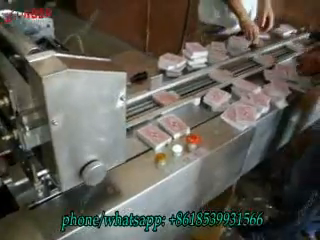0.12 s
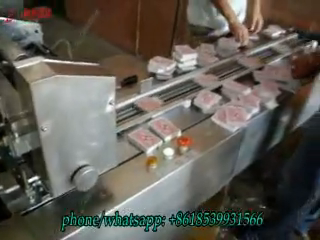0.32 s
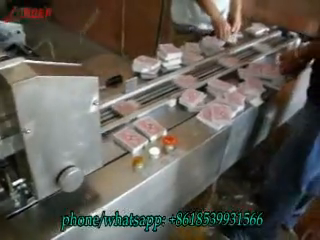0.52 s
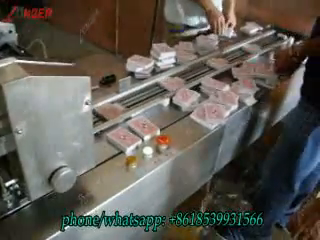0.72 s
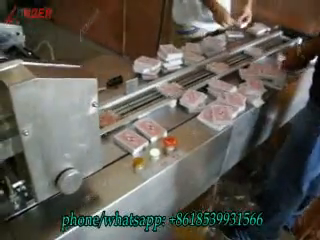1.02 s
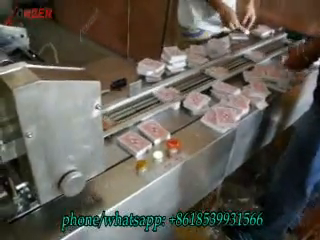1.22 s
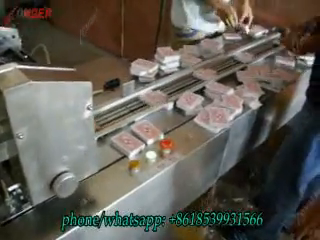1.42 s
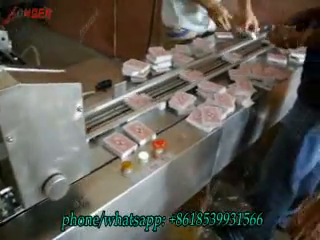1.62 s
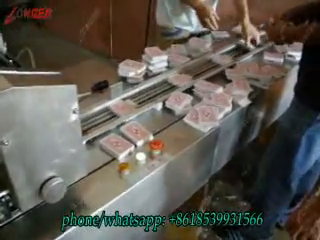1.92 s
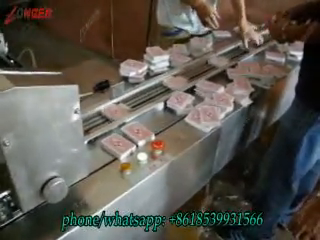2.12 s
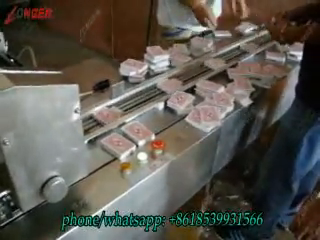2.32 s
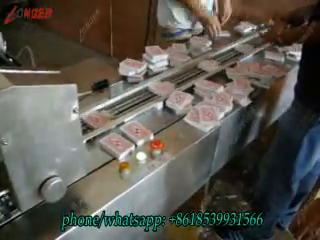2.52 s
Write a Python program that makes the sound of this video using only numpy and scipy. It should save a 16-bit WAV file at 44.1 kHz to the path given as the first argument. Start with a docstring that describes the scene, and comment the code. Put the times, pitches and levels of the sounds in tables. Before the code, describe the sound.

A wrapping machine runs in an echoing workshop: a heavy hollow steel knock, a ringing clack, scattered ticks, then another knock and clack over a quiet motor drone, through a dull, overloading microphone.

```python
"""An echoing workshop, with a cheap, dull microphone whose input overloads on the loudest blows.
A wrapping machine runs: motors and chains drone as bands of noise, with a crackling rattle in the treble.
Once a cycle the linkage ticks and rattles in short noise bursts and clacks on a ringing bar.
Heavy knocks on a hollow steel cabinet stand in front: beating modes, a low thump and a crack."""
import sys
import numpy as np
from scipy import signal
from scipy.fft import rfft, irfft
from scipy.io import wavfile
from scipy.ndimage import uniform_filter1d

SR = 44100
rng = np.random.default_rng(int(sys.argv[2]) if len(sys.argv) > 2 else 0)


def volts_from_db(level):
    """Convert decibel levels to linear amplitude ratios."""
    exponent = np.asarray(level, float) / 20
    return 10 ** exponent


def generate_wav(sig):
    """Save sig (samples, or channels by samples) to the path in sys.argv[1] as 16-bit PCM at SR."""
    pcm = np.round(np.clip(np.atleast_2d(sig).T, -1, 1) * 32767).astype(np.int16)
    wavfile.write(sys.argv[1], SR, pcm)


N = 119070  # 2.7 s
BANDS_HZ = 25 * 2 ** np.arange(0, 7.7, 1 / 3)  # third-octave centres


def unit(x):
    """Scale to rms 1."""
    return x / np.sqrt(np.mean(x ** 2))


def shape_db(table, hz):
    """Read a (frequency [Hz], value) table on a log-frequency axis."""
    table = np.array(table, float)
    return np.interp(np.log(hz), np.log(table[:, 0]), table[:, 1])


def band(hz, width_hz, size):
    """Noise in one bell-shaped band, rms 1."""
    f = np.arange(size // 2 + 1) * SR / size
    bell = np.exp(-0.5 * ((f - hz) / width_hz) ** 2)
    return unit(irfft(rfft(rng.standard_normal(size)) * bell, size))


def fade(t, t60):
    """Exponential decay by 60 dB in t60 seconds, held within 0.01 to 3 s."""
    return np.exp(-np.log(1000) * t / np.clip(t60, 0.01, 3))


def add(out, s, x):
    """Mix x in at s seconds."""
    i = int(s * SR)
    out[i:i + len(x)] += x[:N - i]


def walk(rate):
    """Random levels held 1 / rate s and slewed twice."""
    k = int(SR / rate)
    held = np.repeat(rng.standard_normal(N // k + 1), k)
    return 1.3 * uniform_filter1d(uniform_filter1d(held, k), k)[:N]


def chain_rattle():
    """Chain links strike at random moments and strengths; each strike leaves a very short decay, rms 1."""
    strikes_per_s, spread_db = 140, 3.5
    strikes = rng.random(N) < strikes_per_s / SR
    links = strikes * volts_from_db(spread_db * rng.exponential(size=N))
    return unit(signal.lfilter([1], [1, -0.99], links))


# colour of the motors and gears: (frequency [Hz], relative level [dB per Hz])
DRONE_COLOUR = [(12, -30), (22, 9), (54, -1), (80, -2.5), (156, 0), (290, -1.5), (450, -2), (600, -7.5),
                (800, -4), (1100, -5), (1500, -21.5), (2000, -18.5), (2700, -16.5), (3500, -24.5),
                (4400, -35), (5700, -35.5)]
# how loud the machine stands behind the hits: (time [s], level [dB])
DRONE_LEVEL = [(0.0, -25), (0.53, -24.5), (0.89, -26), (1.65, -27), (2.15, -26), (2.7, -27.5)]


def drone():
    """Motors and gears in third-octave bands that swell together and flicker alone; links rattle in the treble."""
    swell_scale_db, flicker_scale_db = 0.8, 1.2  # these scale the random walks
    rattle_gain = 2 * volts_from_db(-17.5)  # against each treble band
    out, swell, links = 0, walk(9), chain_rattle()
    for hz in BANDS_HZ:
        db = shape_db(DRONE_COLOUR, hz) + swell_scale_db * swell + flicker_scale_db * walk(12)
        rattle = 1 + (hz > 1300) * rattle_gain * links
        # the root of hz turns level per Hz into level per third octave
        out = out + volts_from_db(db) * np.sqrt(hz) * band(hz, hz / 8, N) * rattle
    curve = np.array(DRONE_LEVEL)
    return unit(out) * volts_from_db(np.interp(np.arange(N) / SR, curve[:, 0], curve[:, 1]))


# linkage ticks: (time [s], level [dB], centre [Hz], t60 [s])
LINKAGE_TICKS = [(0.1053, -28.5, 3730, 0.072), (0.106, -26.5, 1137, .3), (0.1478, -41.5, 2565, 0.039),
                 (0.5253, -29.5, 3336, .1), (0.545, -38.5, 3130, 0.28), (.557, -31, 2500, .05),
                 (0.576, -24.5, 2470, 0.079), (0.5959, -17.5, 2270, 0.062), (.612, -31, 3160, 0.11),
                 (0.599, -38, 3200, 0.29), (1.0898, -38, 2600, 0.094), (1.1542, -27.5, 2650, 0.17),
                 (1.16, -22.5, 672, 0.14), (1.4896, -31.5, 2666, 0.051), (1.5309, -32, 2376, 0.046),
                 (1.6272, -41.5, 3240, 0.12), (1.792, -20, 1260, 0.16), (1.802, -39, 2290, 0.081),
                 (1.7979, -24.5, 3410, 0.053), (2.001, -40.5, 2755, 0.33), (2.1488, -27.5, 1124, 0.48),
                 (2.1468, -31, 2490, 0.026), (2.149, -15, 591, 0.13), (2.205, -39.5, 3560, .2),
                 (2.232, -32.5, 2910, 0.38), (2.2809, -14.5, 2440, 0.035), (2.287, -34, 3430, 0.19),
                 (2.26, -24.5, 976, 0.67), (.6, -22, 930, 0.26), (0.251, -19, 2760, 0.17),
                 (.253, -3, 853, 0.064), (1.794, -40, 4400, 0.089), (.697, -20, 3610, 0.027),
                 (2.3883, -19.5, 3330, 0.038)]
# dull thuds and rebounds of the panel: (time [s], level [dB])
PANEL_THUDS = [(.581, -11), (.607, -14.5), (1.1325, -24.5), (2.019, -21), (0.293, -5), (0.453, -19.5),
               (1.963, -4), (2.099, -15.5)]


def ticks():
    """Small parts and packs meet, the panel thuds: short noise bursts around one pitch region."""
    thud_hz, thud_t60_s = 356, 0.05
    wide_click_db = -5  # against the narrow burst
    out, t = np.zeros(N), np.arange(8192) / SR
    thuds = [(s, db, thud_hz, thud_t60_s) for s, db in PANEL_THUDS]
    for s, db, hz, t60 in LINKAGE_TICKS + thuds:
        narrow = band(hz, 0.135 * hz, len(t))
        wide = volts_from_db(wide_click_db) * band(hz, 0.8 * hz, len(t))
        onset = 1 - np.exp(-t / 0.0007)
        add(out, s, volts_from_db(db) * (narrow + wide) * fade(t, t60) * onset)
    return out


def blow(modes, blur_hz, body, body_db, t60s):
    """One blow: each mode is a cluster of close neighbours that beat; countless small modes fade as noise."""
    t = np.arange(32768) / SR
    ring = 0
    for hz, db, t60 in modes:
        tone = np.sin(2 * np.pi * hz * t)
        cluster = 0.6 * band(hz, blur_hz, len(t)) * (1 - np.exp(-t / 0.0067))
        ring = ring + volts_from_db(db) * (tone + cluster) * fade(t, t60)
    gains = np.array([volts_from_db(shape_db(body, hz)) * np.sqrt(hz) * (hz >= body[0][0]) for hz in BANDS_HZ])
    gains = gains / np.sqrt(np.sum(gains ** 2))
    dense = 0
    for hz, gain in zip(BANDS_HZ, gains):
        t60 = shape_db([(200, t60s[0]), (3000, t60s[1])], hz)
        dense = dense + gain * band(hz, hz / 8, len(t)) * fade(t, t60)
    return ring / 2 + volts_from_db(body_db) * dense * (1 - np.exp(-t / 0.006))


# clacks on the bar: (time [s], level [dB])
BAR_CLACKS = [(.6972, -5.5), (2.387, -7)]
# modes of the bar: (frequency [Hz], relative level [dB], t60 [s])
BAR_MODES = [(330, -6, .1), (438, -3, .17), (890, -14, .2), (969, -12, .1), (1060, -4, .06),
             (1106, -1, .22), (1145, -11, .3), (1502, -17, .15), (2137, -22, .1)]
# colour of the bar's dense small modes: (frequency [Hz], relative level [dB per Hz])
BAR_BODY = [(120, -33), (200, -1.5), (457, 4.5), (631, -23.5), (1130, -1), (1300, -19.5), (3380, -18.5),
            (4370, -57.5), (5680, -62.5), (9610, -120)]


def clacks():
    """The ringing clack, once a machine cycle: a blow on the bar sets its modes ringing."""
    blur_hz, body_db, body_t60_s = 8, -6, (0.15, 0.22)  # t60 at 200 Hz and 3 kHz
    out = np.zeros(N)
    for s, db in BAR_CLACKS:
        add(out, s, volts_from_db(db) * blow(BAR_MODES, blur_hz, BAR_BODY, body_db, body_t60_s))
    return out


# heavy knocks on the cabinet: (time [s], level [dB], lead of a light first contact [s])
CABINET_KNOCKS = [(0.2411, -3, 0.0015), (1.9078, -5, 0.0028)]
# modes of the hollow cabinet: (frequency [Hz], relative level [dB], t60 [s])
CABINET_MODES = [(218.4, -13.5, 0.34), (263.6, -6, 0.11), (316.3, -1, 0.36), (368, -6, 1),
                 (376, -7.5, 0.58), (418.6, -8.5, 0.36), (559.6, -7, 0.54), (636, -20, 0.28),
                 (791, -22, 0.9), (843, -6.5, 0.13), (926, -43, 0.36), (1092, -5, 0.27),
                 (1398, -20.5, 0.15)]
# colour of the cabinet's dense small modes: (frequency [Hz], relative level [dB per Hz])
CABINET_BODY = [(41, -48), (70, -22), (150, -17), (243, -8), (350, 0), (470, -12), (700, -21), (900, -19),
                (1100, -15), (1440, -28), (2650, -36), (4370, -42), (5680, -60)]


def knocks():
    """Heavy blows on the cabinet: a light first contact, a crack, the panel's thump, a rough ring."""
    blur_hz, body_db, body_t60_s = 12, -1.5, (0.83, 0.23)  # t60 at 200 Hz and 3 kHz
    thump_hz, thump_db, thump_t60_s = 276.4, 9.5, 0.048  # the first swing of the big panel
    crack_hz, crack_width_hz, crack_db, crack_t60_s = 1500, 1300, -4.5, 0.088  # the contact
    lead_hz, lead_db, lead_t60_s = 650, 1, 0.01  # the light first contact
    out = np.zeros(N)
    t = np.arange(8192) / SR
    for s, db, lead in CABINET_KNOCKS:
        ring = blow(CABINET_MODES, blur_hz, CABINET_BODY, body_db, body_t60_s)
        thump = volts_from_db(thump_db) * np.sin(2 * np.pi * thump_hz * t) * fade(t, thump_t60_s)
        crack = volts_from_db(crack_db) * band(crack_hz, crack_width_hz, len(t)) * fade(t, crack_t60_s)
        first = -volts_from_db(lead_db) * np.sin(2 * np.pi * lead_hz * t) * fade(t, lead_t60_s)
        add(out, s, volts_from_db(db) * ring)
        add(out, s, volts_from_db(db) * thump)
        add(out, s, volts_from_db(db) * crack)
        add(out, s - lead, volts_from_db(db) * first)
    return out


def workshop_echo(hits):
    """The room answers with a dense noise tail that builds up softly, decays and is weak in the treble."""
    room_t60_s, room_db = 0.65, -13.5
    t = np.arange(SR) / SR
    tail = rng.standard_normal(SR) * fade(t, room_t60_s) * (1 - np.exp(-(t / 0.016) ** 2))
    tail = signal.lfilter([1], [1, -0.8], tail)
    tail = tail / np.sqrt(np.sum(tail ** 2))
    return volts_from_db(room_db) * signal.fftconvolve(hits, tail)[:N]


def scene():
    """The hits echo in the workshop over the drone."""
    hits = ticks() + clacks() + knocks()
    return (drone() + workshop_echo(hits) + hits)[None]


def top_cut(x):
    """Nothing passes above the cut-off."""
    return signal.sosfilt(signal.butter(12, 15800, fs=SR, output="sos"), x)


def record(dry):
    """The microphone input clips, a steep filter dulls the sound, and the loudest overshoots clip once more."""
    clip_in, clip_out, offset = 0.7, 0.725, 0.0058  # full scale is 1
    soft_hz, top_hz, spill_hz = 4200, 4550, 10500  # gentle, steep and last low-pass
    x = np.clip(dry, -clip_in, clip_in)
    x = signal.sosfilt(signal.butter(2, soft_hz, fs=SR, output="sos"), x)
    x = signal.sosfilt(signal.ellip(8, 0.5, 85, top_hz, fs=SR, output="sos"), x)
    x = np.clip(x, -clip_out, clip_out)
    x = signal.sosfilt(signal.butter(4, spill_hz, fs=SR, output="sos"), x)
    mix = x + offset
    return top_cut(mix)


dry = scene()
out = record(dry)
generate_wav(out)
```